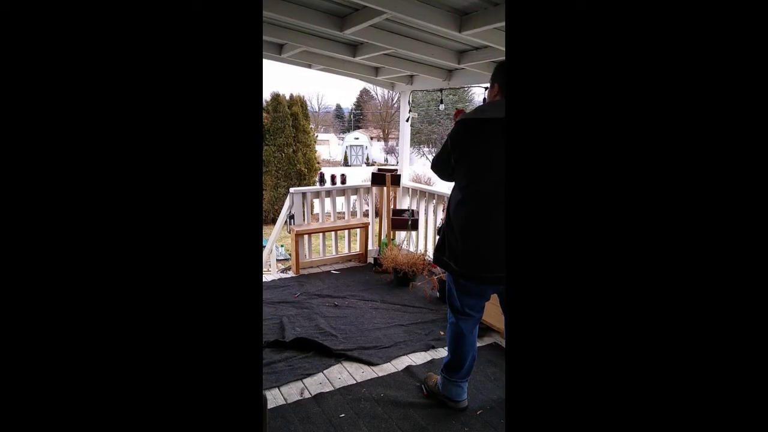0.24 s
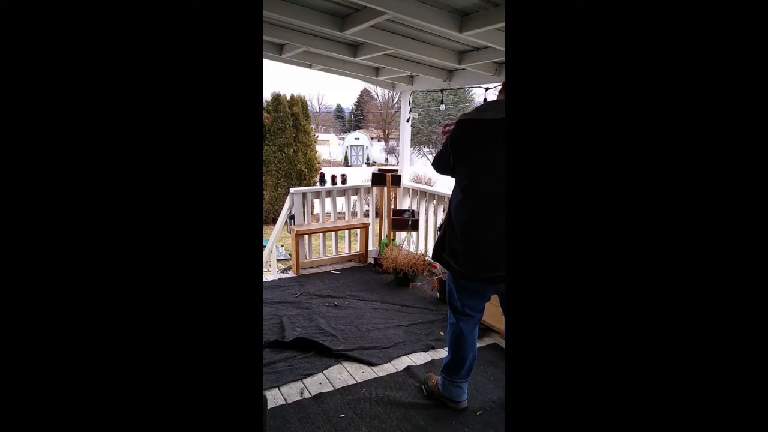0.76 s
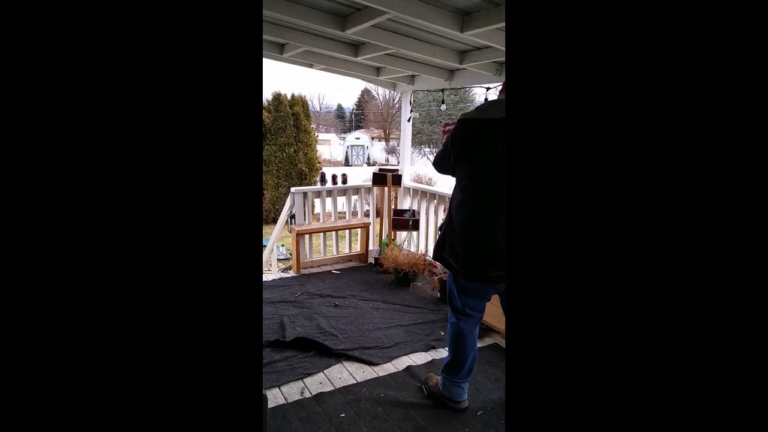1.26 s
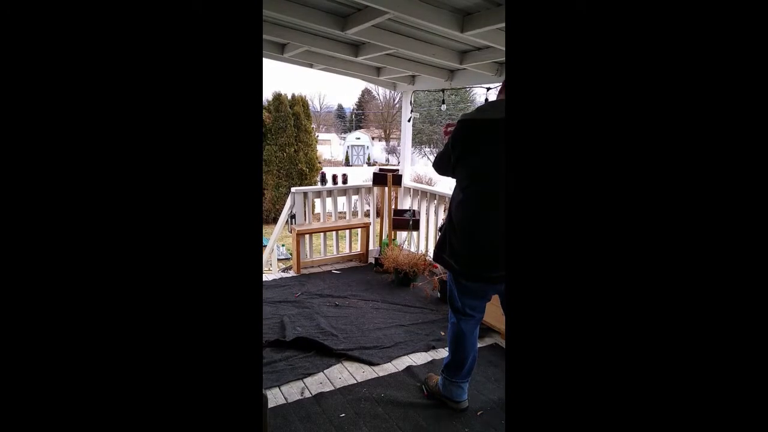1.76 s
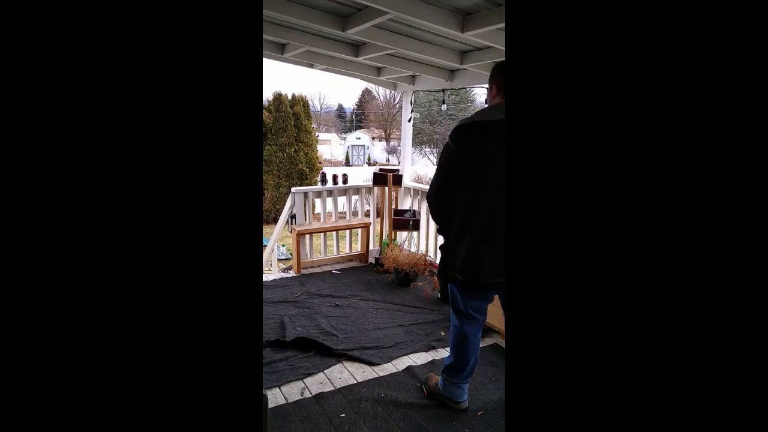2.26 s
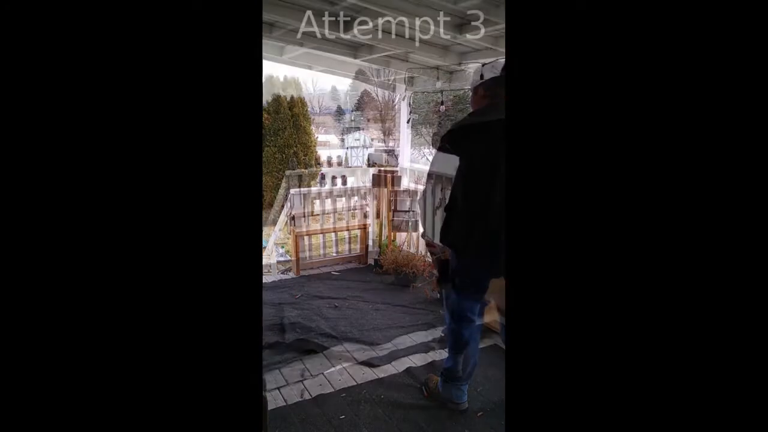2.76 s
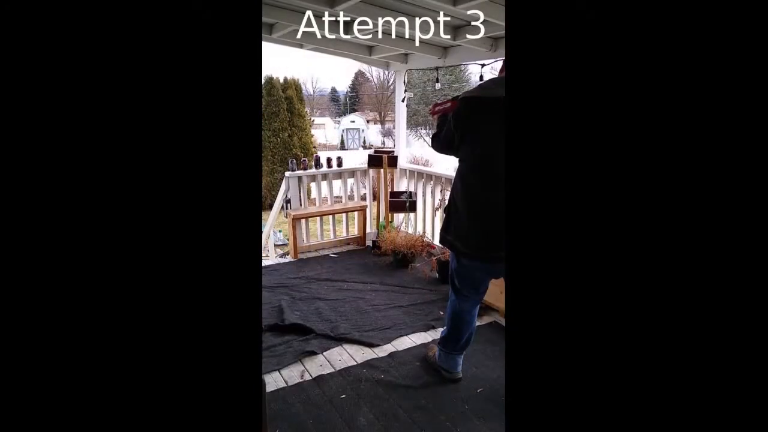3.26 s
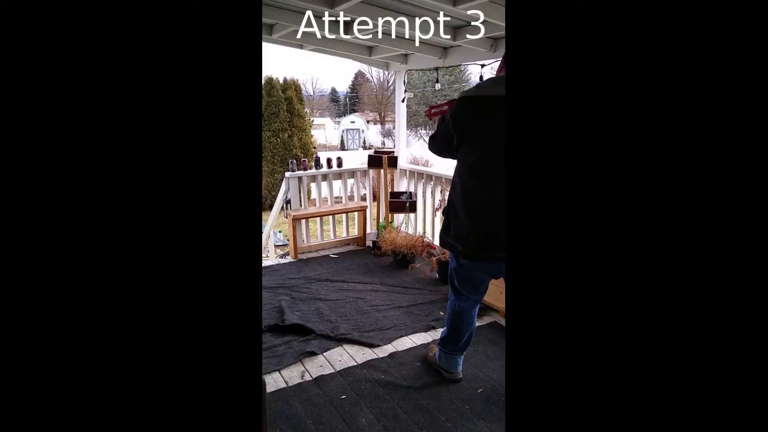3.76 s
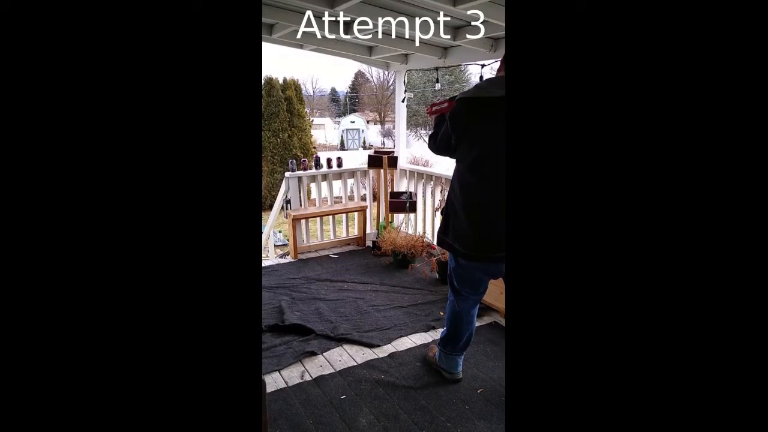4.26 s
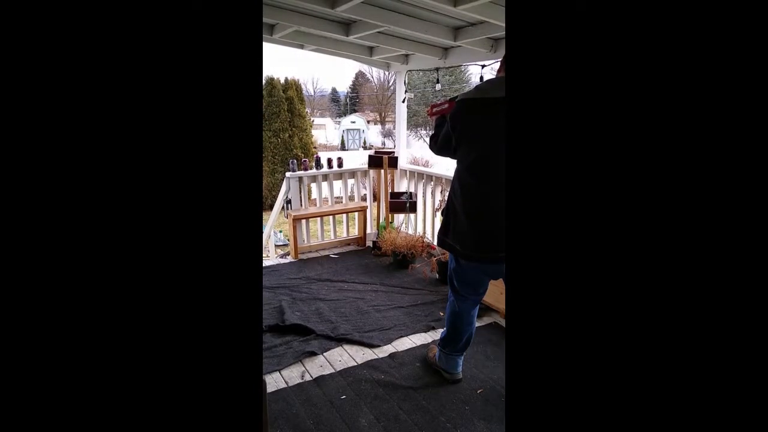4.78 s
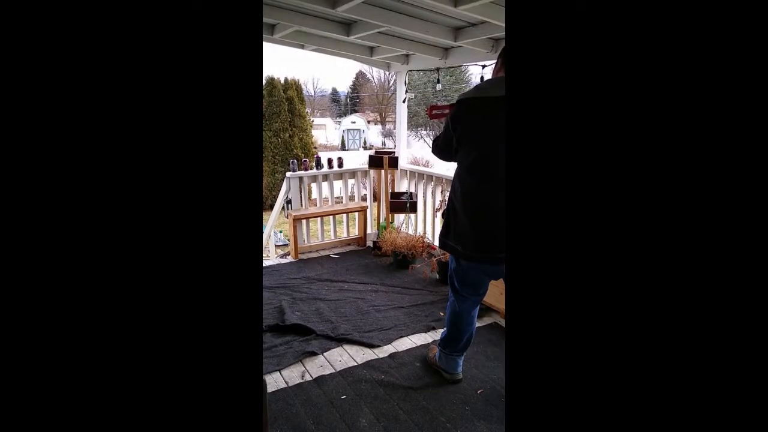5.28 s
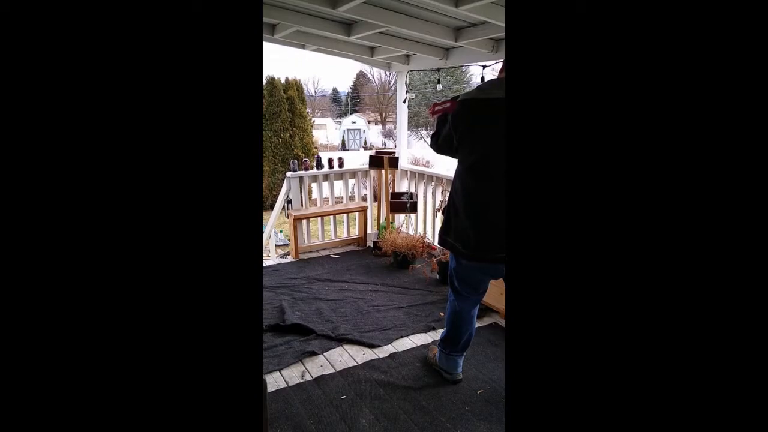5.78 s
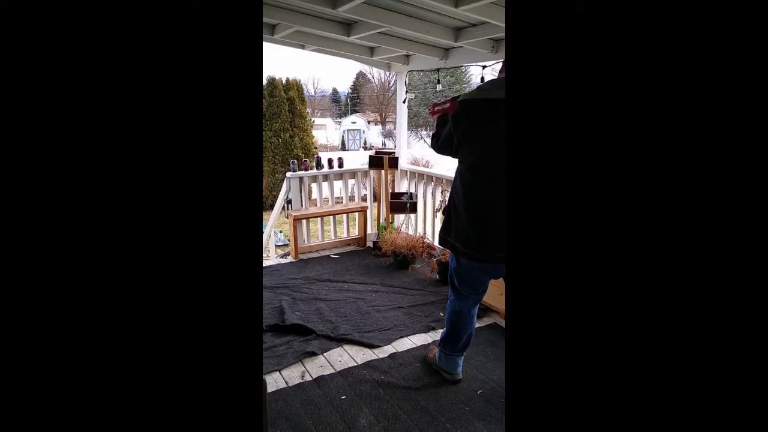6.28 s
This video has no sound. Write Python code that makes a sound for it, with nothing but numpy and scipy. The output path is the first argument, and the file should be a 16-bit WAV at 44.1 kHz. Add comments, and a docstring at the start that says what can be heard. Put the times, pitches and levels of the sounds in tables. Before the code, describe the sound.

Hollow plastic knocks open the scene, then a toy foam-dart blaster snaps loudly: a brief burst of air, a woody pop and a shaking spring. A second snap follows after quiet handling ticks. The slide is then racked with sharp, bright clacks, a third, slightly softer pop comes, then another racking and a final shot. Stereo microphones nearby catch the tight reverberation of a roofed porch, soft road noise, a low hum in the first part and sparse garden birds.

```python
"""A covered wooden porch: a spring-driven foam dart blaster is primed and fired four times. Each shot is shaped
noise (plunger hiss, spring judder) plus resonated impulses (pop, thump, shell). The plastic slide scrapes and
clacks: noise rubs and short rattles, with knocks ringing a hollow shell. Far traffic is two bands of noise; the
background level dips near 2.8 s and rises again. A machine hums as a wavering sine, small birds chirp in the
gardens as gliding sines. Echoes and decaying noise place the blaster."""
import sys
import numpy as np
from scipy import signal
from scipy.fft import rfft, irfft, next_fast_len
from scipy.io import wavfile
from scipy.ndimage import uniform_filter1d

SR = 44100
rng = np.random.default_rng(int(sys.argv[2]) if len(sys.argv) > 2 else 0)


def master_out(mix):
    """Clip the mix to full scale and print it as 16-bit PCM to the path in sys.argv[1]."""
    frames = np.transpose(np.atleast_2d(mix))
    ceiling = np.clip(frames, -1, 1)
    pcm = np.round(ceiling * 32767).astype(np.int16)
    wavfile.write(sys.argv[1], SR, pcm)


def magnitude_from_level(level_db):
    """Linear magnitude for a level in decibels (20 dB per decade)."""
    exponent = np.asarray(level_db, float) / 20
    return 10 ** exponent


N = 287973

# Left-right correlation of noise: hz [Hz], likeness [-1..1]
LIKENESS = [(60, 1), (180, 0.98), (550, 0.77), (1650, -0.018), (4970, 0.53), (15000, -0.03)]

# Background level, moving rumble and roar together; it dips and rises: time_s [s], roar_db [dB]
BACKGROUND_LEVEL = [(0.0, -56.5), (0.32, -53.5), (0.96, -58), (1.55, -57), (1.69, -53.5), (2.83, -64),
                    (3.05, -60.5), (3.44, -54.5), (3.85, -55), (4.03, -59), (4.31, -59), (5.4, -54),
                    (5.78, -59), (6.4, -55.5)]
# Road rumble spectrum, relative: hz [Hz], level_db [dB per Hz]
RUMBLE_SPECTRUM = [(26, -36), (42, -2.5), (108, -2.5), (140, -8), (167, -5.5), (199, -8), (230, -4),
                   (330, -14.5), (430, -47), (730, -120)]
# Tyre roar spectrum, relative: hz [Hz], level_db [dB per Hz]
ROAR_SPECTRUM = [(190, -30.5), (330, -7.5), (499, -7.5), (700, -5.5), (1010, -7), (1280, -10), (1920, -18),
                 (2830, -30), (6000, -44), (7800, -76), (13200, -120)]
RUMBLE_OVER_ROAR_DB, RUMBLE_FLUTTER_DB, ROAR_FLUTTER_DB = 5.5, 1.8, 1.8

HUM_HZ, HUM_DB, HUM_WAVER_HZ, HUM_WAVER_DB = 268.9, -55, 2.7, 2.8
HUM_START_S, HUM_END_S, HUM_RISE_S, HUM_FALL_S = 0.11, 2.705, 0.13, 0.45

# Hollow shell modes of the blaster: mode_hz [Hz], width_hz [Hz], gain_db [dB]
SHELL_MODES = [(300.1, 35, 13), (683, 130, 4.5), (832.6, 240, 9), (1166, 180, 4), (1580, 540, 4),
               (2384, 420, -3)]
# Catches, stops, darts landing: start_s [s], rattle_db [dB], treble_over_rattle_db [dB],
# knock_db [dB peak], ring_hz [Hz, where the shell rings most]
CLACKS = [(0.173, -45.5, -19, -40, 352), (0.197, -45, -7, -38.5, 773), (0.2253, -34, -8, -26.5, 347),
          (0.2988, -49.5, -5.5, -53, 1034), (0.477, -31, -8.5, -22.5, 677), (2.062, -58.5, -16, -42.5, 916),
          (2.194, -71.5, -26, -44, 521), (2.3389, -58.5, -29, -45, 297), (2.7739, -75, 6.5, -59.5, 960),
          (3.4551, -47, -11, -38, 1056), (3.674, -16.5, 3, -21.5, 1580), (3.687, -26, 8.5, -17, 1807),
          (3.6993, -26.5, 0.8, -22, 1726), (3.7877, -36, -3.5, -40, 762), (3.8861, -47, -8, -34, 790),
          (3.933, -31.5, 1.65, -24, 956), (4.9432, -40, 13, -18, 1593), (5.0658, -49.5, -3.5, -47.5, 301),
          (5.1142, -56.5, 3, -49.5, 301), (5.163, -56.5, -9, -34.5, 902), (5.1991, -65, -1, -51.5, 835),
          (5.276, -49, -6, -40, 803), (5.252, -59.5, -13, -35, 758), (5.3217, -13.5, 4, -20, 1260),
          (5.3394, -24.5, 3.5, -19.5, 890.6), (5.4307, -30.5, -6.5, -33.5, 2210),
          (5.59, -36.5, -3, -26.5, 740), (5.8395, -86, 0, -58, 602)]
# Slide rubbing along its rails, even dB ramp: start_s [s], end_s [s], start_db [dB], end_db [dB]
STROKES = [(0.16, 0.225, -67, -47), (0.4, 0.49, -70, -53.5), (2.04, 2.138, -77.5, -80.5),
           (2.19, 2.4, -75.5, -79), (3.607, 3.643, -74.5, -62.5), (3.643, 3.686, -48.5, -31),
           (3.89, 3.932, -65, -65.5), (5.0, 5.071, -67.5, -67), (5.253, 5.272, -63, -72.5),
           (5.275, 5.323, -57, -34), (5.498, 5.589, -72.5, -56.5)]
# Clack and rub spectrum, relative: hz [Hz], level_db [dB per Hz]
PLASTIC_SPECTRUM = [(880, -33), (1500, 1.5), (1820, -2.5), (2580, -1), (2970, 0), (4390, -3), (6360, -11),
                    (13400, -3), (15900, -8.5), (16500, -31)]
RATTLE_ATTACK_S, RATTLE_T60_S, MIDDLE_TOP_HZ = 0.0017, 0.029, 6200
# The hand-held body thuds just after each knock.
THUD_HZ, THUD_WIDTH_HZ, THUD_DB, THUD_LAG_S = 377, 250, -11.5, 0.01

# Bird notes, one glide each: start_s [s], length_s [s], from_hz [Hz], to_hz [Hz], level_db [dB]
BIRDS = [(.372, .04, 3570, 3860, -60), (0.729, .13, 5130, 2210, -66), (0.736, 0.034, 5000, 4060, -79),
         (1.138, 0.029, 4400, 5180, -75), (1.143, 0.051, 2300, 3100, -73), (1.204, 0.03, 3000, 3850, -65),
         (1.23, 0.046, 3840, 3870, -68), (1.302, 0.053, 3750, 3570, -84), (1.302, 0.088, 2150, 1950, -67),
         (1.45, 0.044, 6550, 7100, -85), (1.485, 0.044, 7000, 4400, -75), (1.81, .11, 4620, 4450, -73.5),
         (1.81, .08, 2250, 1760, -60.5), (1.91, 0.061, 4450, 3050, -69), (1.987, 0.032, 2800, 2320, -66),
         (2.36, .035, 3100, 3200, -75), (2.393, 0.018, 3150, 4300, -64), (2.402, 0.052, 3950, 3580, -66),
         (2.95, 0.046, 8100, 8600, -78), (3.001, 0.018, 3510, 4410, -69), (3.015, 0.058, 4330, 3300, -70),
         (3.047, 0.045, 3330, 3010, -70), (3.505, 0.082, 4210, 3300, -67.5), (4.02, 0.024, 4475, 3285, -71),
         (4.07, .04, 4400, 4400, -79.5), (4.34, 0.036, 4600, 6100, -75), (4.38, .02, 6000, 5100, -80),
         (4.446, 0.043, 4400, 4900, -78), (4.725, 0.024, 4300, 4500, -75), (4.699, 0.049, 3670, 3900, -66),
         (4.738, 0.043, 3620, 2430, -65.5), (5.076, 0.099, 4760, 3700, -69),
         (5.485, 0.089, 4500, 3470, -60), (6.016, 0.038, 3290, 4310, -72), (6.041, 0.025, 4800, 5700, -73),
         (6.058, .03, 5200, 5230, -71), (6.084, 0.017, 5320, 3950, -73), (6.092, .025, 3950, 4800, -65),
         (6.114, .025, 4800, 4900, -77), (6.118, .025, 3960, 4150, -69), (6.135, .015, 4920, 4270, -70),
         (6.143, .03, 3300, 4350, -64.5), (6.173, .025, 4300, 4320, -68)]
WARBLE_SHARE, BIRD_FLUTTER_DB = 0.02, 3.5  # warble as a share of the pitch
NOTE_ARCH = 1  # roundness of a note's swell, 0 = flat top
BIRD_ECHO_DB, BIRD_ECHO_T60_S, BIRD_ECHO_BUILD_UP_S = -23, 0.24, 0.02

# Shots: start_s [s], hiss_db [dB], pop_db [dB], thump_db [dB]
SHOTS = [(1.5238, -15.5, -5.5, -24.5), (3.2715, -15, -5.5, -25.5), (4.8171, -15.5, -12.5, -30),
         (6.352, -16, -5, -25.5)]
# Plunger hiss spectrum, relative: hz [Hz], level_db [dB per Hz]
HISS_SPECTRUM = [(180, -32), (300, -1.5), (1230, -18), (2400, -1), (3900, -2.5), (4390, -4), (7890, -8),
                 (12400, 1), (15400, -4.5), (16500, -27)]
# Spring noise spectrum, relative: hz [Hz], level_db [dB per Hz]
JUDDER_SPECTRUM = [(120, -41), (200, -16), (284, 4), (354, -14.5), (468, -5.5), (892, -1.5), (1160, -7.5),
                   (1290, -5), (2010, -8.5), (3700, -8), (7320, -18), (15000, -14), (16500, -35.5)]
TRIGGER_LEAD_S, TRIGGER_OVER_POP_DB = 0.0016, -15.5  # click of the catch letting go
TRAVEL_S, HISS_RISE_S, HISS_T60_S = 0.0072, 0.003, 0.012
JUDDER_OVER_HISS_DB, JUDDER_T60_S = -14.5, 0.3
POP_HZ, POP_WIDTH_HZ, THUMP_HZ, THUMP_WIDTH_HZ = 890, 880, 138.5, 69

# Roof, floor and wall echoes: left_s [s], right_s [s], left_db [dB], right_db [dB]
ECHOES = [(.0021, 0.0018, -22, -2), (.0066, .0086, -5, -18.5), (.0135, .0135, -16, -5.5),
          (.019, .021, -11, -8), (.031, 0.044, -12.5, -10)]
ECHO_LOW_HZ, ECHO_CUT_HZ, RIGHT_LAG_S = 450, 3100, 0.0002
# Porch decay: hz [Hz], t60_s [s]
PORCH_DECAY = [(100, 0.12), (260, 0.13), (700, 0.19), (1840, 0.204), (4850, 0.1846), (12800, 0.14)]
PORCH_DB, BUILD_UP_S, GARDEN_DB, GARDEN_T60_S, GARDEN_CUT_HZ = 4.5, 0.00043, -23, 0.89, 4200
FAR_ECHO_S, FAR_ECHO_SPREAD_S = 0.12, 0.054
FAR_ECHO_HZ, FAR_ECHO_WIDTH_HZ, FAR_ECHO_DB = 1150, 1300, -48
# Blaster balance between the ports: hz [Hz], left_minus_right_db [dB]
LEAN = [(60, -1.5), (110, 0.5), (200, -2), (380, -4), (700, 2), (1290, -1.0), (2380, 0), (4400, 0.5),
        (8120, -1), (15000, 6.5)]

# Microphone hiss spectrum, relative: hz [Hz], level_db [dB per Hz]
SELF_NOISE_SPECTRUM = [(2350, -30.5), (4000, -2), (4810, -10.5), (6240, -4), (8250, -8), (14900, -1),
                       (16500, -14)]
SELF_NOISE_DB, LOW_CUT_HZ, OVERLOAD_AMPLITUDE = -81, 45, 0.9


def rms_one(x):
    """Scale to rms 1."""
    return x / np.sqrt(np.mean(x ** 2) + 1e-20)


def in_time(rows):
    """Interpolate the columns of a time curve at every sample."""
    time_s, *columns = np.transpose(rows)
    return [np.interp(np.arange(N) / SR, time_s, column) for column in columns]


def at_hz(points, hz):
    """Read a spectrum on a log-frequency axis."""
    points_hz, values = np.transpose(points)
    return np.interp(np.log(hz + 1), np.log(points_hz + 1), values)


def drift(rate):
    """Smoothed random wander of rms about 1; a higher rate wanders faster."""
    steps = rng.standard_normal(int(N / SR * 100) + 2)  # 100 per second
    slow = rms_one(signal.lfilter([1], [1, -np.exp(-rate / 16)], steps))
    return np.interp(np.arange(N) / SR * 100, np.arange(len(slow)), slow)


def coloured(spectrum, size=N):
    """Stereo noise of a given spectrum and left-right likeness by frequency; rms 1."""
    padded = next_fast_len(size)
    hz = np.fft.rfftfreq(padded, 1 / SR)
    mid, side = rfft(rng.standard_normal((2, padded)))
    alike = np.clip(at_hz(LIKENESS, hz), -1, 1)
    both = np.sqrt(1 + alike) * mid + np.sqrt(1 - alike) * side * [[1], [-1]]
    noise = irfft(both * magnitude_from_level(at_hz(spectrum, hz)), padded)
    return rms_one(noise[:, :size])


def resonate(x, hz, width_hz):
    """Two-pole resonance, gain about 1 on top."""
    r = np.exp(-np.pi * width_hz / SR)
    zeros = np.array([1, 0, -1]) * (1 - r * r) / 2
    poles = [1, -2 * r * np.cos(2 * np.pi * hz / SR), r * r]
    return signal.lfilter(zeros, poles, x + 1e-18)


def convolve(x, response):
    """Play a sound through a stereo impulse response."""
    return signal.fftconvolve(np.atleast_2d(x), response, axes=1)[:, :N]


def gritty(spread_db):
    """Uneven gain grains, about half a millisecond long; rms 1."""
    grains = magnitude_from_level(spread_db * rng.standard_normal(N // 24 + 1))
    return rms_one(np.repeat(grains, 24)[:N])


def shell(x, around_hz, octaves):
    """The hollow body rings at a few modes; the place of the blow favours those near one pitch."""
    out = 0
    for k, (mode_hz, width_hz, gain_db) in enumerate(SHELL_MODES):
        favour = np.exp(-(np.log2(mode_hz / around_hz) / octaves) ** 2 / 2)
        sign = (-1) ** k
        out = out + favour * magnitude_from_level(gain_db) * sign * resonate(x, mode_hz, width_hz)
    return out


def traffic():
    """Rumble and tyre roar: shaped noise on one background level curve, each with its own flutter."""
    roar_db, = in_time(BACKGROUND_LEVEL)
    rumble_db = roar_db + RUMBLE_OVER_ROAR_DB + RUMBLE_FLUTTER_DB * drift(14)
    rumble = magnitude_from_level(rumble_db) * coloured(RUMBLE_SPECTRUM)
    roar = magnitude_from_level(roar_db + ROAR_FLUTTER_DB * drift(28)) * coloured(ROAR_SPECTRUM)
    return rumble + roar


def hum():
    """A far machine tone: a sine wavering in pitch and level."""
    t = np.arange(N) / SR
    rise, fall = (t - HUM_START_S) / HUM_RISE_S, (HUM_END_S - t) / HUM_FALL_S
    fade = np.clip(np.minimum(rise, fall), 0, 1)
    level = np.sqrt(2) * magnitude_from_level(HUM_DB + HUM_WAVER_DB * drift(10))  # sqrt(2): rms to peak
    hz = HUM_HZ + HUM_WAVER_HZ * drift(10)
    return fade * level * np.sin(2 * np.pi * np.cumsum(hz) / SR)


def slide():
    """Clacks are contact rattles plus shell knocks; rubbing on the rails is ramped, grainy noise."""
    levels, knocks, rub = np.zeros((2, N)), np.zeros(N), np.zeros(N)  # levels: treble, middle
    t = np.arange(SR // 8) / SR
    fall = np.clip(t / RATTLE_ATTACK_S, 0, 1) * magnitude_from_level(-60 * t / RATTLE_T60_S)
    for start_s, rattle_db, treble_over_rattle_db, knock_db, ring_hz in CLACKS:
        at = slice(round(start_s * SR), round(start_s * SR) + len(t))
        levels[:, at] += magnitude_from_level(np.array([[rattle_db + treble_over_rattle_db], [rattle_db]])) * fall
        blow = rng.standard_normal(len(t)) * fall ** 3
        knock = shell(blow, ring_hz, octaves=0.9)
        knock += magnitude_from_level(-10.5) * resonate(blow, ring_hz, 1.9 * ring_hz)
        shake = rng.standard_normal(len(t)) * t / THUD_LAG_S * np.exp(-t / THUD_LAG_S)
        thud = resonate(resonate(shake, THUD_HZ, THUD_WIDTH_HZ), THUD_HZ, THUD_WIDTH_HZ)
        knock += magnitude_from_level(THUD_DB) * thud
        knocks[at] += magnitude_from_level(knock_db) * knock / np.abs(knock).max()

    for start_s, end_s, start_db, end_db in STROKES:
        at = slice(round(start_s * SR), round(end_s * SR))
        rub[at] += magnitude_from_level(np.linspace(start_db, end_db, len(rub[at])))
    rub = uniform_filter1d(rub, size=150)

    rub_levels = rub * magnitude_from_level(np.array([[0], [-4]]))
    bright, middle = levels * gritty(4.5) + rub_levels * gritty(3.0)
    plastic = coloured(PLASTIC_SPECTRUM)[0]
    below = signal.sosfilt(signal.butter(4, MIDDLE_TOP_HZ, fs=SR, output="sos"), plastic)
    above = signal.sosfilt(signal.butter(4, MIDDLE_TOP_HZ, "high", fs=SR, output="sos"), plastic)
    contact = bright * rms_one(above) + middle * rms_one(below)
    rubbed_shell = magnitude_from_level(10) * shell(rub * rng.standard_normal(N), 1000, octaves=2.9)
    return contact + knocks + rubbed_shell


def birds():
    """Warbling, fluttering sine glides, blurred by echoes off the houses."""
    song, warble = np.zeros(N), 1 + WARBLE_SHARE * drift(80)
    for start_s, length_s, from_hz, to_hz, level_db in BIRDS:
        at = slice(round(start_s * SR), round((start_s + length_s) * SR))
        along = np.linspace(0, 1, len(song[at]))
        hz = from_hz * (to_hz / from_hz) ** along * warble[at]
        arch = np.abs(np.sin(np.pi * along)) ** NOTE_ARCH
        song[at] += magnitude_from_level(level_db) * arch * np.sin(2 * np.pi * np.cumsum(hz) / SR)
    t = np.arange(SR // 2) / SR
    build_up = np.clip(t / BIRD_ECHO_BUILD_UP_S, 0, 1) ** 2
    blur = rng.standard_normal((2, len(t))) * magnitude_from_level(BIRD_ECHO_DB - 60 * t / BIRD_ECHO_T60_S) * build_up
    blur[:, 0] = 1  # direct sound
    return convolve(song * magnitude_from_level(BIRD_FLUTTER_DB * drift(40)), blur)


def shots():
    """Hiss swells as the plunger travels; its stop pops the air column and thumps; the spring shakes."""
    swell, judder, pops, thumps = np.zeros((4, N))
    for start_s, hiss_db, pop_db, thump_db in SHOTS:
        at = slice(round((start_s - TRIGGER_LEAD_S) * SR), round(start_s * SR) + SR // 2)
        stop = round((start_s + TRAVEL_S) * SR)
        t = np.arange(len(swell[at])) / SR
        rise = np.clip(t / HISS_RISE_S, 0, 1)
        after_s = np.clip(t - TRIGGER_LEAD_S - TRAVEL_S, 0, 1)
        swell[at] += magnitude_from_level(hiss_db) * rise * magnitude_from_level(-60 * after_s / HISS_T60_S)
        judder[at] += magnitude_from_level(hiss_db + JUDDER_OVER_HISS_DB) * rise * magnitude_from_level(-60 * after_s / JUDDER_T60_S)
        pops[stop] = -magnitude_from_level(pop_db)
        pops[at.start] = magnitude_from_level(pop_db + TRIGGER_OVER_POP_DB)
        thumps[stop] = -magnitude_from_level(thump_db)
    # Divide out the small impulse gain of a narrow resonance.
    pop = resonate(resonate(pops, POP_HZ, POP_WIDTH_HZ), POP_HZ, POP_WIDTH_HZ)
    pop *= SR / (np.pi * POP_WIDTH_HZ)
    thump = resonate(thumps, THUMP_HZ, THUMP_WIDTH_HZ) * SR / (np.pi * THUMP_WIDTH_HZ)
    hiss = swell * gritty(3.0) * coloured(HISS_SPECTRUM)[0]
    spring = judder * gritty(2.7) * coloured(JUDDER_SPECTRUM)[0]
    return hiss + spring + pop + thump + magnitude_from_level(14.5) * shell(pops, 440, octaves=0.6)


def early():
    """Direct sound and a few band-limited echoes off roof, floor and walls."""
    echoes = np.zeros((2, SR // 10))
    for left_s, right_s, left_db, right_db in ECHOES:
        at = [round(left_s * SR), round(right_s * SR)]
        echoes[[0, 1], at] += magnitude_from_level(np.array([left_db, right_db]))
    band = signal.butter(1, [ECHO_LOW_HZ, ECHO_CUT_HZ], "band", fs=SR)
    response = signal.lfilter(*band, echoes)
    response[[0, 1], [0, round(RIGHT_LAG_S * SR)]] += 1  # the left port is nearer
    return response


def porch():
    """Noise tail dying band by band, plus a faint long one from the gardens."""
    size = SR // 2
    t, hz = np.arange(size) / SR, np.fft.rfftfreq(size, 1 / SR)
    noise, tail = rfft(coloured([(20, 0), (20000, 0)], size=size)), 0
    edges_hz = 60 * 2 ** np.arange(0, 8.6, 0.5)  # half octaves
    for low_hz, high_hz in zip(edges_hz, edges_hz[1:]):
        centre_hz = np.sqrt(low_hz * high_hz)
        band = irfft(noise * ((hz >= low_hz) & (hz < high_hz)), size)
        near = magnitude_from_level(-60 * t / at_hz(PORCH_DECAY, centre_hz))
        garden = magnitude_from_level(GARDEN_DB - 60 * t / GARDEN_T60_S) / (1 + (centre_hz / GARDEN_CUT_HZ) ** 2)
        tail = tail + band * (near + garden)
    return magnitude_from_level(PORCH_DB) * tail * (1 - np.exp(-t / BUILD_UP_S)) / np.sqrt(SR / 50)


def houses():
    """Dull, smeared echo from the houses across the garden: a noise burst, mid tones only."""
    t = np.arange(SR // 2) / SR
    spread = np.exp(-((t - FAR_ECHO_S) / FAR_ECHO_SPREAD_S) ** 2 / 2)
    smear = rng.standard_normal((2, len(t))) * spread
    for _ in range(2):
        smear = resonate(smear, FAR_ECHO_HZ, FAR_ECHO_WIDTH_HZ)
    return magnitude_from_level(FAR_ECHO_DB) * smear


def scene():
    """The blaster sends unlike noise three ways into the porch; the left port hears more of its treble."""
    ways = [(shots(), slide()) for _ in range(3)]
    tails = [convolve(shot + magnitude_from_level(-3.5) * clack, porch()) for shot, clack in ways]
    shot, clack = ways[0]
    blaster = convolve(shot + clack, early()) + sum(tails) / np.sqrt(len(ways))
    blaster += convolve(shot, houses())
    half_lean_db = at_hz(LEAN, np.fft.rfftfreq(N, 1 / SR)) / 2
    blaster = irfft(rfft(blaster) * magnitude_from_level(half_lean_db * [[1], [-1]]), N)
    return traffic() + hum() + birds() + blaster


def top_cut(x):
    """Nothing passes above the cut-off."""
    return signal.sosfilt(signal.butter(12, 16810, fs=SR, output="sos"), x)


def record(dry):
    """The microphones lose the deepest bass, round the highest peaks and add their own hiss."""
    low_cut = signal.butter(3, LOW_CUT_HZ, "high", fs=SR, output="sos")
    heard = signal.sosfilt(low_cut, dry)
    rounded = OVERLOAD_AMPLITUDE * np.tanh(heard / OVERLOAD_AMPLITUDE)
    mix = rounded + magnitude_from_level(SELF_NOISE_DB) * coloured(SELF_NOISE_SPECTRUM)
    return top_cut(mix)


dry = scene()
out = record(dry)
master_out(out)
```